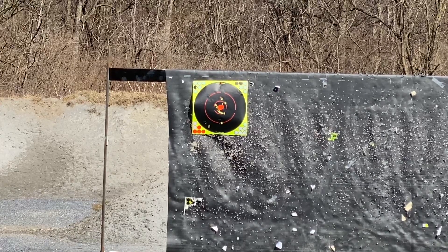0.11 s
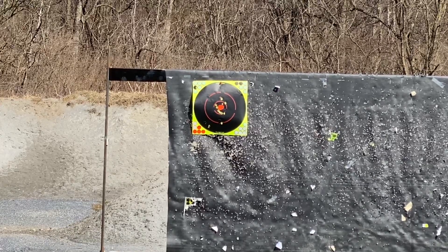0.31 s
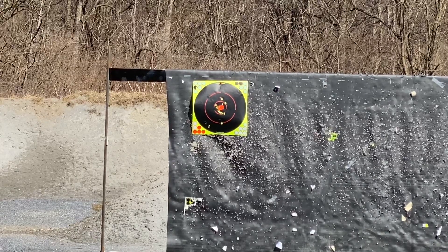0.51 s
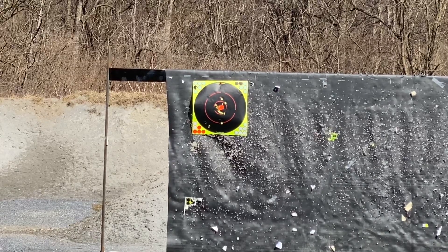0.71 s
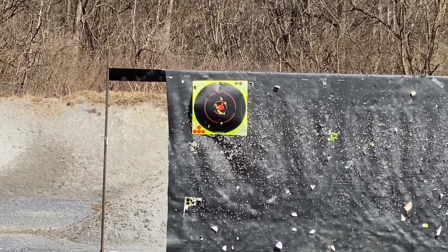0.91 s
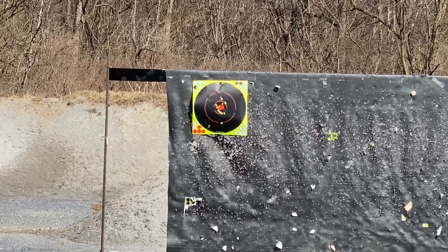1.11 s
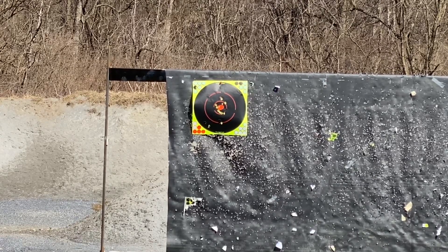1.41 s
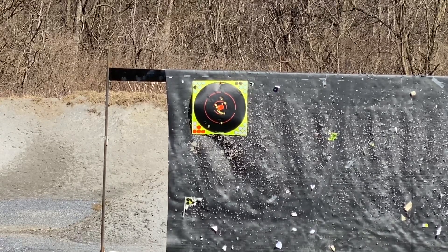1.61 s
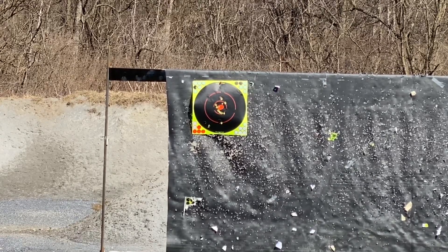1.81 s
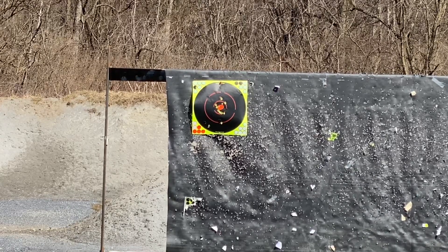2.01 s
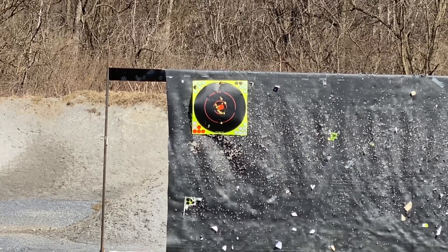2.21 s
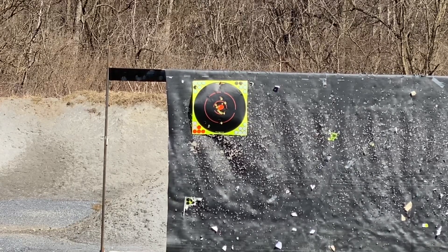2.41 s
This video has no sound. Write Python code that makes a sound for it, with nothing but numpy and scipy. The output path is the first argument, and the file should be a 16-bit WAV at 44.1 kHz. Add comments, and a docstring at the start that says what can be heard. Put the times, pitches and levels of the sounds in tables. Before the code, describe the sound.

A suppressed small-calibre pistol fires once at about 0.23 s: tight sharp crack, gas puff, metallic ring, small thump and thin fading whistle, close beside the shooter. The shelter rings briefly; a dull earth-bank thud returns near 0.39 s and woods echo fades. Faint dry clicks come around 0.9-1.0 s. A brass case tinks at 1.23 s, then rattles lightly from 1.68 to 2.4 s, over quiet uneven low rumble.

```python
"""A suppressed small-calibre pistol fires once under the roof of an outdoor firing line, mic beside the shooter.
Up close, pressure jumps crack, gas bursts as shaped noise, metal modes ring and a thump and thin whistle sink.
The spent case bounces to rest on the hard floor: noise ticks, rough clinks and ringing brass, after a faint whir.
Shelter, side banks and woods answer with decaying noise bands; pitch-falling thuds return from the earth bank.
Small dry handling clicks sit over a low, uneven rumble and faint far noise."""
import sys
import numpy as np
from scipy import signal
from scipy.fft import rfft, irfft
from scipy.io import wavfile
from scipy.ndimage import uniform_filter1d

SR = 44100
rng = np.random.default_rng(int(sys.argv[2]) if len(sys.argv) > 2 else 0)


def wrap_up_sound(samples):
    """Save the sound to the file named by the first command line argument, as 16-bit audio."""
    columns = np.atleast_2d(samples).T
    # keep every value between -1 and 1, then stretch to whole-number steps
    tamed = np.clip(columns, -1, 1)
    steps = np.round(tamed * 32767).astype(np.int16)
    wavfile.write(sys.argv[1], SR, steps)


N = 114660
T = np.arange(N) / SR  # time [s]


def from_db(db):
    """Decibels to amplitude gain."""
    return 10 ** (np.asarray(db) / 20)


def rms_one(x):
    """Scale to rms 1."""
    return x / np.sqrt(np.mean(x ** 2) + 1e-20)


def at_hz(points, hz, axis=1):
    """Read a column of a spectrum table on a log-frequency axis."""
    points = np.array(points)
    return np.interp(np.log(hz + 1e-3), np.log(points[:, 0]), points[:, axis])


def noise(spectrum):
    """Steady noise of a given colour, rms 1, with nothing at or below 18 Hz."""
    hz = np.fft.rfftfreq(N, 1 / SR)
    gain = from_db(at_hz(spectrum, hz)) * (hz > 18)
    return rms_one(irfft(rfft(rng.standard_normal(N)) * gain, N))


def envelope(start, rise, t60):
    """Straight rise, then exponential decay by 60 dB in t60 seconds."""
    decay = np.exp(-np.log(1000) * np.maximum(T - start - rise, 0) / t60)
    return np.clip((T - start) / rise, 0, 1) * decay


def ring(start, hz, t60, rise=1 / SR):
    """A struck mode: a decaying sine with an envelope of height 1."""
    return envelope(start, rise, t60) * np.sin(2 * np.pi * hz * (T - start))


def knock(start, db, start_hz, end_hz, rise, t60, fall):
    """A short pressure wave whose pitch drops quickly, with time constant fall [s]."""
    pitch = end_hz + (start_hz - end_hz) * np.exp(-np.maximum(T - start, 0) / fall)
    phase = 2 * np.pi * np.cumsum(pitch * (T >= start)) / SR
    return from_db(db) * envelope(start, rise, t60) * np.sin(phase)


def tail(table, start, rise):
    """Diffuse echoes: third-octave bands of noise, each dying at its own rate."""
    source, hz, out = rfft(noise(table)), np.fft.rfftfreq(N, 1 / SR), 0
    edges = 35 * 2 ** (np.arange(28) / 3)
    for low, high in zip(edges, edges[1:]):
        band = irfft(source * ((hz >= low) & (hz < high)), N)
        out = out + band * envelope(start, rise, at_hz(table, np.sqrt(low * high), axis=2))
    return out


# Sharp pressure jumps of the shot and their first reflections, at the mic beside the shooter:
# (time [s], level before rounding [dB], length [s])
PRESSURE_JUMPS = [(0.2238, -13, .00012), (0.2255, 2, 0.00016), (0.22665, 3, 0.00013), (0.2284, -4, 0.00027),
                  (0.2300, -4, .00018), (0.2346, -10, .0002), (0.2440, -15, .0003), (0.2546, -13, .00025),
                  (0.2824, -14, .00012)]


def cracks():
    """N-shaped pressure jumps, a ramp between two steps, their edges rounded by a low-pass."""
    out = 0
    for start, db, length in PRESSURE_JUMPS:
        u = (T - round(start * SR) / SR) / length  # 0 to 1 through the jump
        out = out + from_db(db) * (2 * u - 1) * ((u >= 0) & (u <= 1))
    return signal.sosfilt(signal.butter(1, 7360, fs=SR, output="sos"), out)


# Close bursts of gas and slide noise: (time [s], level [dB], rise [s], t60 [s])
GAS_BURSTS = [(0.2240, -19, 0.0001, 0.036), (0.2266, -11.5, 0.0014, .02), (0.2296, -13, .0006, 0.013),
              (0.235, -17.5, .0008, .028)]
# Colour of the bursts: (frequency [Hz], relative level [dB per Hz])
GAS_COLOUR = [(100, -10), (220, -5), (300, -13), (420, -6), (540, -11), (750, -2), (1050, -14),
              (1350, -7.5), (1700, 2), (3600, -6), (6100, -1), (7500, -6), (10000, -14.5), (15500, -22)]


def gas():
    """Turbulent gas and slide noise: one coloured noise opened by several short bursts."""
    bursts = sum(from_db(db) * envelope(start, rise, t60) for start, db, rise, t60 in GAS_BURSTS)
    return noise(GAS_COLOUR) * bursts


# Close ring of suppressor and slide: (frequency [Hz], level [dB], t60 [s])
METAL_MODES = [(641, -26, .09), (777, -28, .19), (870, -24.5, .1), (1211, -37, .1), (1500, -30, .08),
               (1769, -26.5, .16), (2073, -39, .2), (2606, -30, .09), (2976, -35, .22), (4314, -30, .17),
               (4790, -28, .14), (5715, -23, .06), (5960, -17, .04), (6015, -33, .28)]
SLIDE_S = 0.2291  # latest start of a mode


def metal():
    """Suppressor and slide ring as decaying modes, each starting up to 1 ms early."""
    out = 0
    for hz, db, t60 in METAL_MODES:
        start = SLIDE_S - rng.uniform(0, .001)
        out = out + from_db(db) * ring(start, hz, t60, rise=.0005)
    return out


# The muzzle's thump, a single row:
# (time [s], level [dB], start pitch [Hz], end pitch [Hz], rise [s], t60 [s])
MUZZLE_THUMP = (0.2283, -15.3, 195, 102, .008, .048)
THUMP_FALL_S = .006


def pistol():
    """Cracks, bursts of gas, the ring of the metal and the low falling thump of the muzzle."""
    return cracks() + gas() + metal() + knock(*MUZZLE_THUMP, THUMP_FALL_S)


# The sag is how far above its steady pitch the whistle starts, and its time constant.
WHISTLE_HZ, WHISTLE_SAG_HZ, WHISTLE_SAG_S = 10040, 300, .005
WHISTLE_S, WHISTLE_DB, WHISTLE_RISE_S, WHISTLE_T60_S = .256, -36, .01, .135


def whistle():
    """A brief thin whistle after the shot: a decaying sine sinking to a steady pitch."""
    pitch = WHISTLE_HZ + WHISTLE_SAG_HZ * np.exp(-np.maximum(T - WHISTLE_S, 0) / WHISTLE_SAG_S)
    tone = np.sin(2 * np.pi * np.cumsum(pitch) / SR)
    return from_db(WHISTLE_DB) * envelope(WHISTLE_S, WHISTLE_RISE_S, WHISTLE_T60_S) * tone


CLINK_WIDTH_HZ, CLINK_T60_S = 220, .013
CLINK_BAND = .13  # share of the pitch to either side


def hollow_note(hz):
    """The rough note of the hollow case: its phase wanders, which widens it into a cluster."""
    wander = np.cumsum(rng.standard_normal(N)) * np.sqrt(2 * np.pi * CLINK_WIDTH_HZ / SR)
    edges = [hz / (1 + CLINK_BAND), hz * (1 + CLINK_BAND)]
    band = signal.butter(2, edges, "band", fs=SR, output="sos")
    return signal.sosfilt(band, np.sin(2 * np.pi * hz * T + wander))


# The case on the hard floor, mostly one end and then the other; ticks and rings are halved when played:
# (time [s], tick level [dB], clink level [dB], clink pitch [Hz], case ring level [dB], mouth ring level [dB])
FLOOR_CONTACTS = [(1.233, -48.5, -49, 5400, -53, -86), (1.2412, -44, -57, 6234, -52, -82),
                  (1.6839, -54, -42, 5450, -64, -88.5), (1.6904, -53, -48, 5600, -68, -90),
                  (1.7420, -66, -68, 5495, -85, -90), (1.9039, -58, -54, 5600, -74, -93),
                  (1.9105, -56, -66, 5600, -71, -92.5), (2.0297, -66, -60, 5600, -74, -60.5),
                  (2.0365, -56, -84, 6300, -58.5, -53), (2.0466, -63, -71, 7000, -68, -57),
                  (2.1540, -62, -65.5, 5200, -77, -90), (2.1600, -63, -60, 4944, -68, -80.5),
                  (2.2050, -75, -68.5, 5482, -77, -88.5), (2.2114, -78.5, -68, 5400, -83, -90),
                  (2.2360, -75.5, -77, 5300, -72.5, -92.5), (2.3080, -70, -71.5, 5700, -73, -91),
                  (2.3260, -78, -69, 5650, -88, -93.5), (2.3548, -76, -65, 5400, -89, -90),
                  (2.4110, -85, -77.5, 5447, -90, -93)]
# The case's ring, then the ring of its mouth, before scatter: (frequency [Hz], t60 [s])
BRASS_MODES = [(12500, .04), (11560, .07)]
# The oval case splits each mode; each contact shifts it a little (shares of the pitch).
CASE_SPLIT, CASE_SCATTER = .017, .004
# Colour of a contact: (frequency [Hz], relative level [dB per Hz])
TICK_COLOUR = [(800, -20), (2000, -6), (3200, -2), (4300, -5), (6000, 8.5), (9000, 0), (13000, -5.5),
               (15500, 1)]
TICK_T60_S = 0.014
# The shelter's answer to the case: (frequency [Hz], relative level [dB per Hz], t60 [s])
CASE_SHELTER = [(1500, -1, 0.19), (3800, -2.5, 0.21), (5570, -5.5, 0.17), (8000, 2, 0.2), (12000, 0, 0.166),
                (15500, 2, 0.157)]
CASE_ROOM_DB, CASE_ROOM_DELAY_S, CASE_ROOM_RISE_S = -4, .004, 0.0099


def spent_case():
    """Each contact is a tick and a clink that set the brass ringing; the shelter throws it back."""
    out, contact = 0, noise(TICK_COLOUR)
    for start, tick_db, clink_db, clink_hz, *mode_dbs in FLOOR_CONTACTS:
        tick = from_db(tick_db) * contact * envelope(start, 1 / SR, TICK_T60_S) / 2
        clink = from_db(clink_db) * envelope(start, .0003, CLINK_T60_S) * hollow_note(clink_hz)
        out = out + tick + clink
        for (hz, t60), db in zip(BRASS_MODES, mode_dbs):
            hz = hz * (1 + CASE_SCATTER * rng.standard_normal())
            split_mode = 0.33 * ring(start, hz * (1 + CASE_SPLIT), t60 / 2)
            out = out + from_db(db) * (ring(start, hz, t60) + split_mode) / 2
    room = tail(CASE_SHELTER, CASE_ROOM_DELAY_S, CASE_ROOM_RISE_S)
    room = room / np.linalg.norm(room)
    return out + from_db(CASE_ROOM_DB) * signal.fftconvolve(out, room)[:N]


WHIR_S, WHIR_DB, WHIR_HZ, WHIR_RISE_S, WHIR_T60_S = 0.643, -82, 5700, .02, .9


def flying_case():
    """Air whirs faintly across the mouth of the spinning case: a fading hollow note."""
    return from_db(WHIR_DB) * envelope(WHIR_S, WHIR_RISE_S, WHIR_T60_S) * hollow_note(WHIR_HZ)


# Ring of the shelter overhead: (frequency [Hz], relative level [dB per Hz], t60 [s])
SHELTER_RING = [(60, -3, .18), (132, 0, .22), (210, 0, .25), (300, -7.5, 0.3), (750, -1, 0.35),
                (1140, -5, 0.27), (2020, 1, .25), (3660, -3, .25), (6000, 2, .23), (9400, -9, 0.25),
                (15500, -15, .21)]
SHOT_S, SHELTER_DB, SHELTER_RISE_S = 0.2255, -23.5, 0.0094
SHELTER_GRAIN_DB, GRAIN_S = 2.5, .002  # separate reflections stand out of the ring
# Echo from the side banks: (frequency [Hz], relative level [dB per Hz], t60 [s])
SIDE_BANKS = [(200, -2, .3), (900, -0.5, .3), (2200, -1, 0.32), (4000, -3.5, .26), (6000, -3, 0.32),
              (9000, -17, 0.25), (15500, -27, 0.18)]
BANKS_S, BANKS_DB, BANKS_RISE_S = 0.332, -52, 0.055
# Echo from the woods: (frequency [Hz], relative level [dB per Hz], t60 [s])
WOODS_ECHO = [(150, 2, 1.495), (500, -2.5, 1.08), (1100, -1.5, 1.28), (2440, -2.5, 1.264),
              (4040, -5, 0.966), (5800, -4.5, 0.84), (9200, -14.5, 0.45), (15000, -27, 0.38)]
WOODS_DB, WOODS_RISE_S = -53, .08


def shot_echoes():
    """The shelter rings briefly, the side banks answer, both grainy; the woods carry on for longer."""
    flutter = rms_one(uniform_filter1d(rng.standard_normal(N), int(GRAIN_S * SR)))
    grain = from_db(SHELTER_GRAIN_DB * flutter)
    shelter = from_db(SHELTER_DB) * tail(SHELTER_RING, SHOT_S, SHELTER_RISE_S)
    banks = from_db(BANKS_DB) * tail(SIDE_BANKS, BANKS_S, BANKS_RISE_S)
    woods = from_db(WOODS_DB) * tail(WOODS_ECHO, SHOT_S, WOODS_RISE_S)
    return grain * (shelter + banks) + woods


# Thuds back from the earth bank, falling in pitch: (time [s], level [dB], start pitch [Hz], t60 [s])
EARTH_BANK_THUDS = [(0.3880, -36.5, 900, .035), (0.4103, -49.5, 1120, 0.043)]
THUD_FALL_S, THUD_END_HZ = 0.00366, 110


def bank_thuds():
    """Dull knocks from the earth bank: sines that drop quickly in pitch as they die."""
    return sum(knock(start, db, hz, THUD_END_HZ, 0.0012, t60, THUD_FALL_S)
               for start, db, hz, t60 in EARTH_BANK_THUDS)


# Small dry handling clicks: (time [s], level before a 9 dB cut [dB], centre pitch [Hz])
HANDLING_CLICKS = [(0.8977, -68, 4498), (0.9940, -58, 3870)]
CLICK_T60_S = 0.016


def handling():
    """Faint dry clicks, each a puff of noise around one pitch."""
    out = 0
    for start, db, hz in HANDLING_CLICKS:
        colour = [(hz / 4, -30), (hz / 2, -14), (hz, 0), (hz * 2, -23), (hz * 4, -36)]
        out = out + from_db(db - 9) * noise(colour) * envelope(start, 0.000416, CLICK_T60_S)
    return out


# Level curve of the rumble, in two stretches, before RUMBLE_DB is added: (time [s], level [dB])
RUMBLE_CURVE = [
    [(0.0, -54), (0.03, -51.5), (0.056, -53), (0.072, -72), (0.09, -57), (0.108, -57), (0.128, -61),
     (0.15, -59), (0.174, -76), (0.2, -56.5)],
    [(0.33, -60.5), (0.47, -54), (0.49, -60.5), (0.77, -46), (0.89, -58), (0.94, -49), (0.99, -58),
     (1.09, -53.5), (1.2, -41), (1.27, -58), (1.76, -51.5), (1.84, -62), (1.88, -50.5), (2.0, -62.5),
     (2.09, -56), (2.23, -64), (2.34, -54), (2.6, -69.5)],
]
# Colour of the rumble: (frequency [Hz], relative level [dB per Hz])
RUMBLE_COLOUR = [(20, -18), (35, -9), (58, 10), (80, -2), (125, -6.5), (165, -11.5), (240, -28),
                 (350, -62.5), (1500, -100)]
RUMBLE_DB, RUMBLE_EVEN_S = 0.5, .11
# Colour of the far outdoor noise: (frequency [Hz], relative level [dB per Hz])
FAR_NOISE = [(40, 0), (170, 8), (280, 0), (450, -6.5), (650, -3.5), (850, 0), (1300, -6.5), (2000, -17),
             (3200, -23), (5000, -26), (10000, -35), (15500, -39)]
AIR_DB = -72


def outdoors():
    """A low rumble, evened out and then swelling with its level curve, and steady far noise."""
    level_db = np.interp(T, *np.transpose(np.vstack(RUMBLE_CURVE)))
    rumble = noise(RUMBLE_COLOUR)
    rumble = rumble / np.sqrt(uniform_filter1d(rumble ** 2, int(RUMBLE_EVEN_S * SR)))
    return from_db(RUMBLE_DB + level_db) * rumble + from_db(AIR_DB) * noise(FAR_NOISE)


def scene():
    """Everything at one microphone beside the shooter, as one channel."""
    shot = pistol() + whistle()
    case = spent_case() + flying_case()
    surroundings = shot_echoes() + bank_thuds() + handling() + outdoors()
    return (shot + case + surroundings)[None]


OVERLOAD = .9  # ceiling of the rounding
CUTOFF_HZ = 15900


def record(dry):
    """The loudest peaks are rounded by a smooth overload, then a steep low-pass cuts the top."""
    rounded = OVERLOAD * np.tanh(dry / OVERLOAD)
    return signal.sosfilt(signal.ellip(10, .1, 90, CUTOFF_HZ, fs=SR, output="sos"), rounded)


dry = scene()
out = record(dry)
wrap_up_sound(out)
```